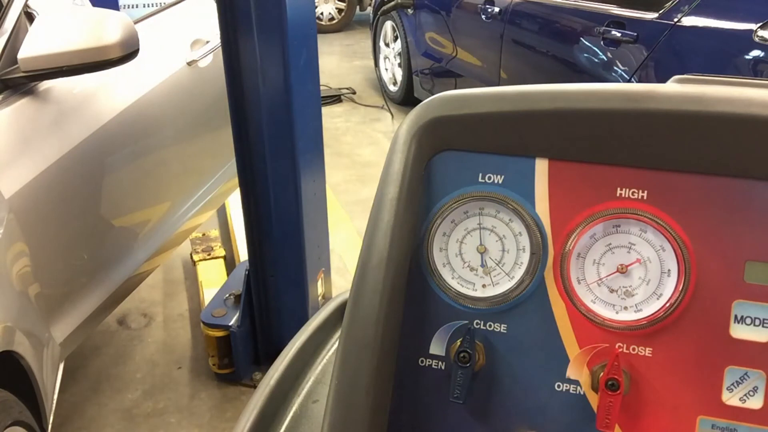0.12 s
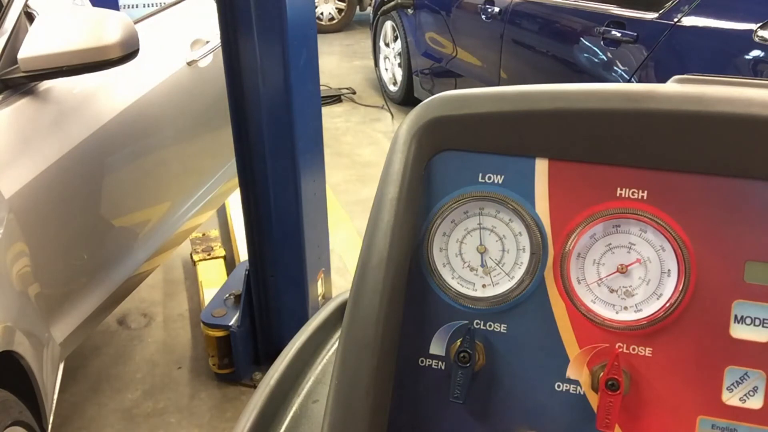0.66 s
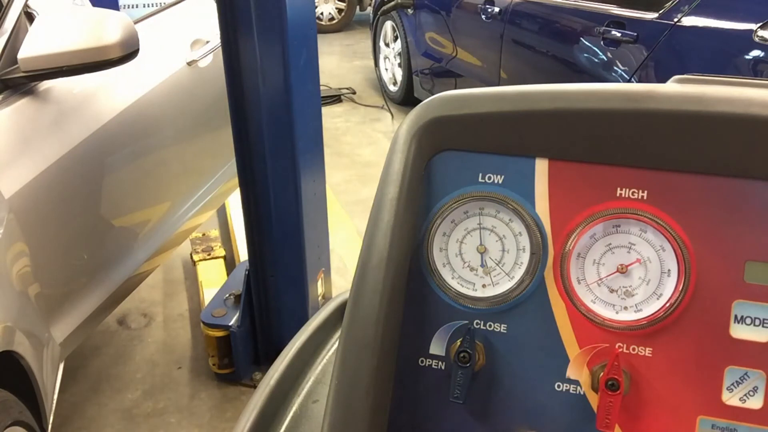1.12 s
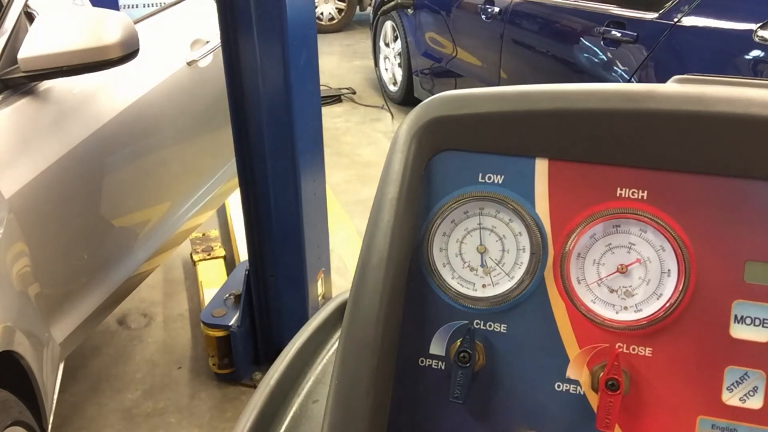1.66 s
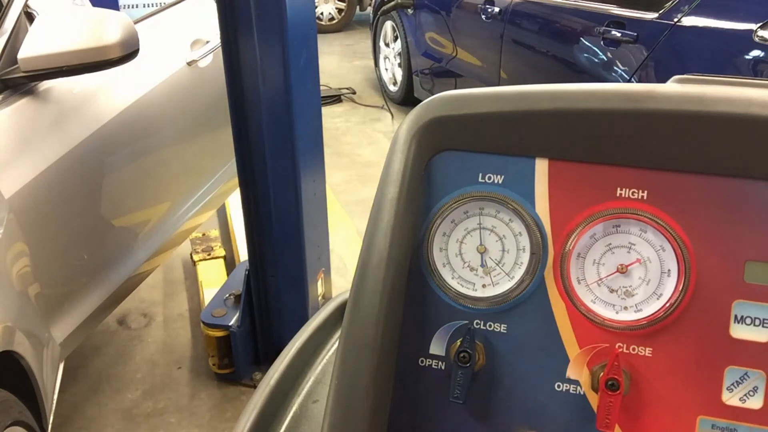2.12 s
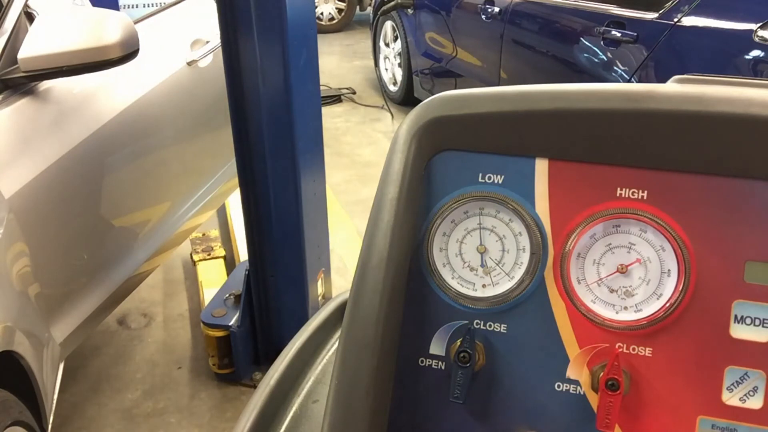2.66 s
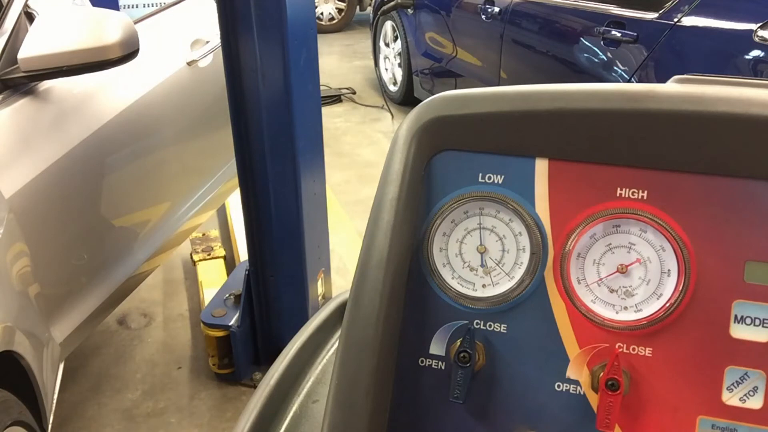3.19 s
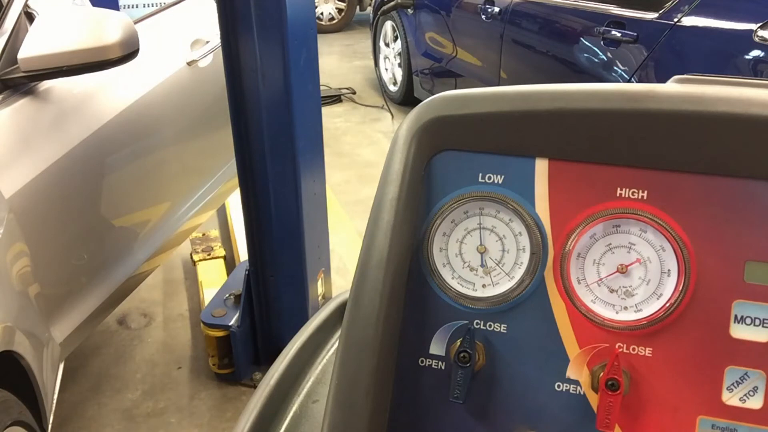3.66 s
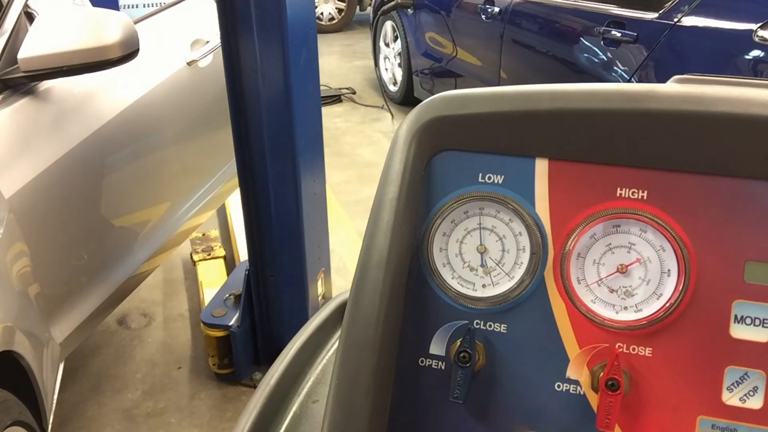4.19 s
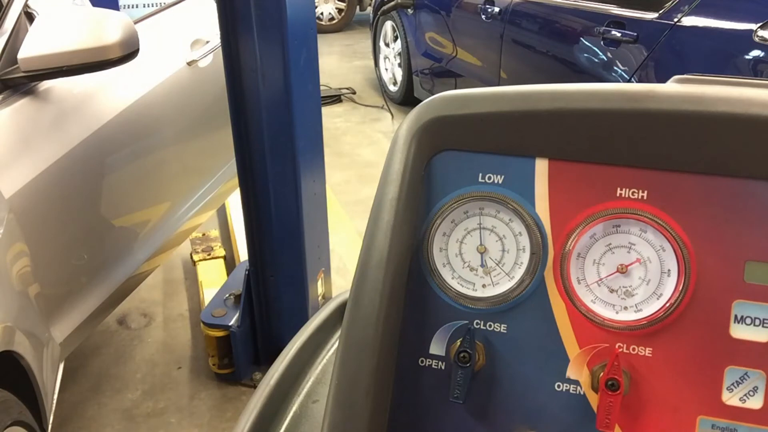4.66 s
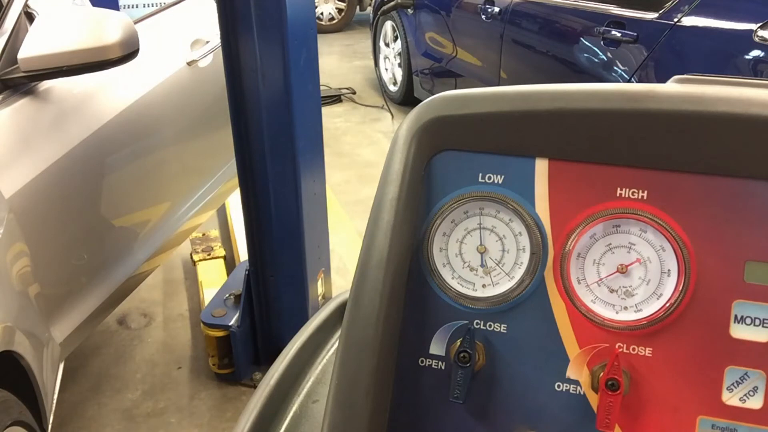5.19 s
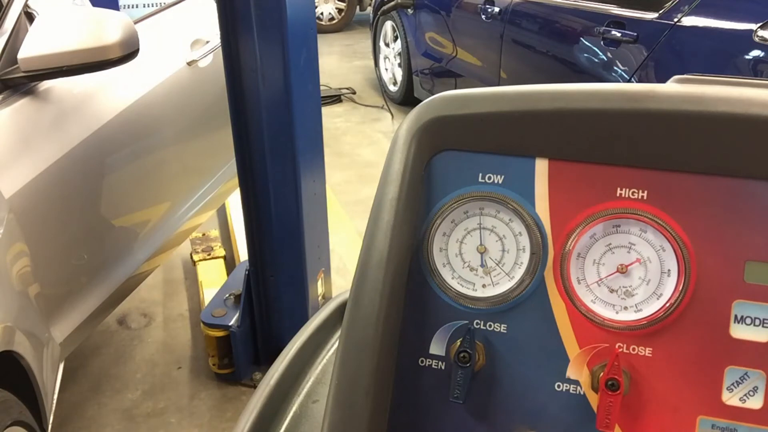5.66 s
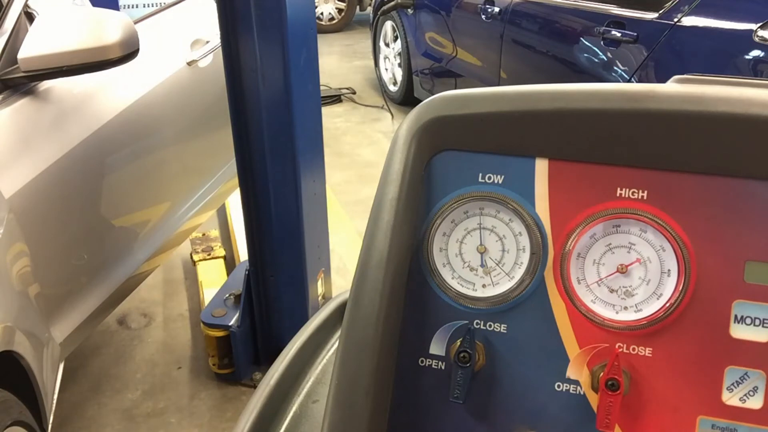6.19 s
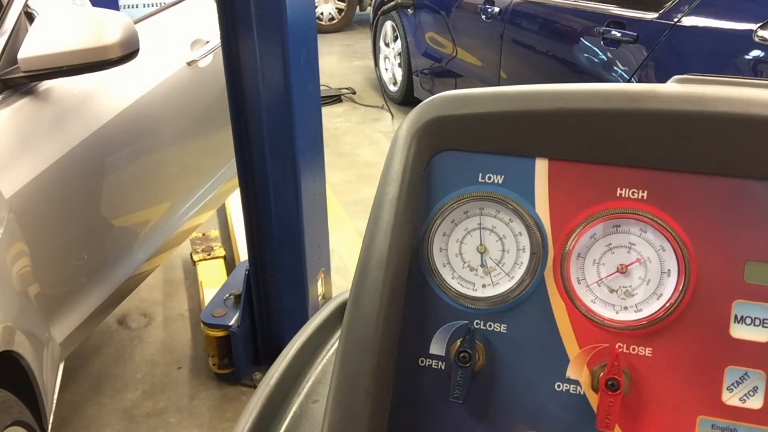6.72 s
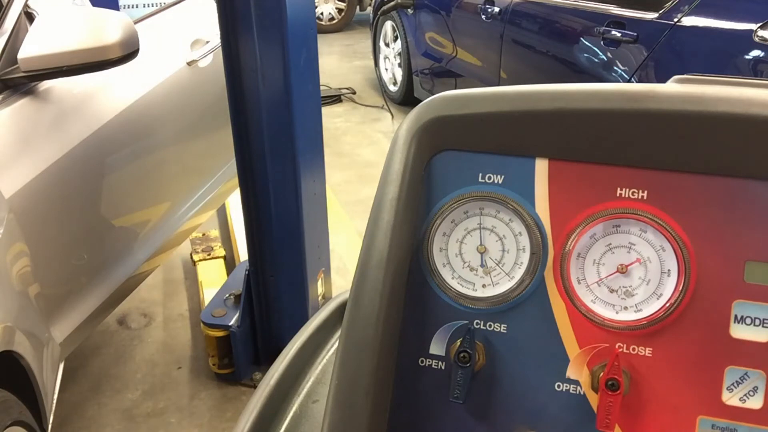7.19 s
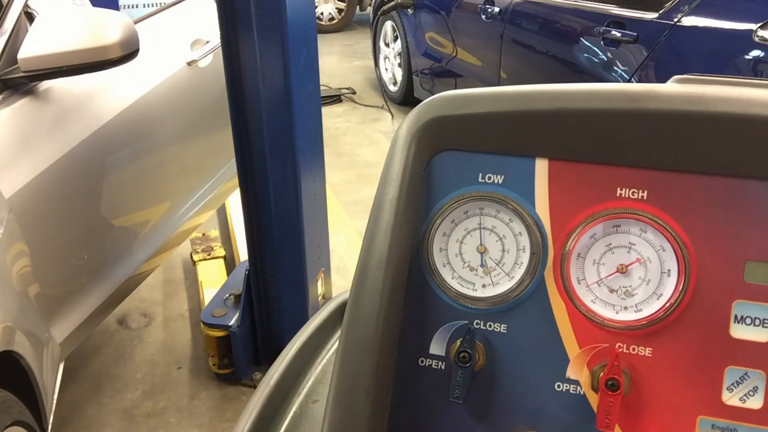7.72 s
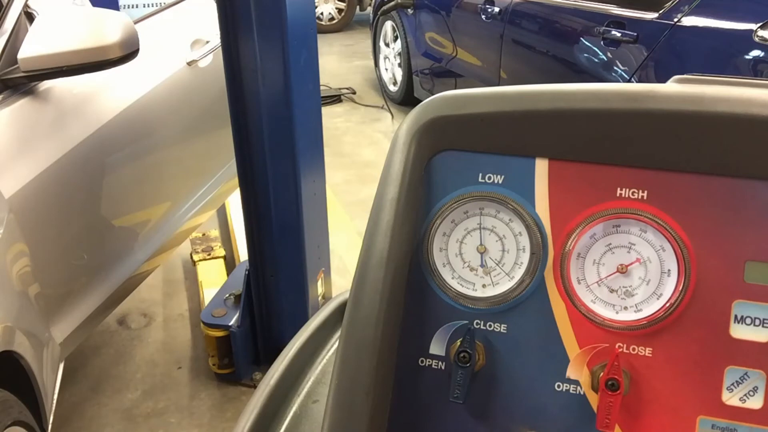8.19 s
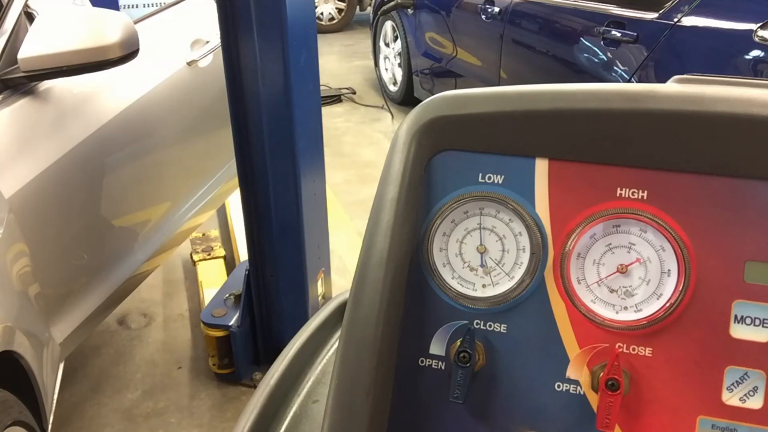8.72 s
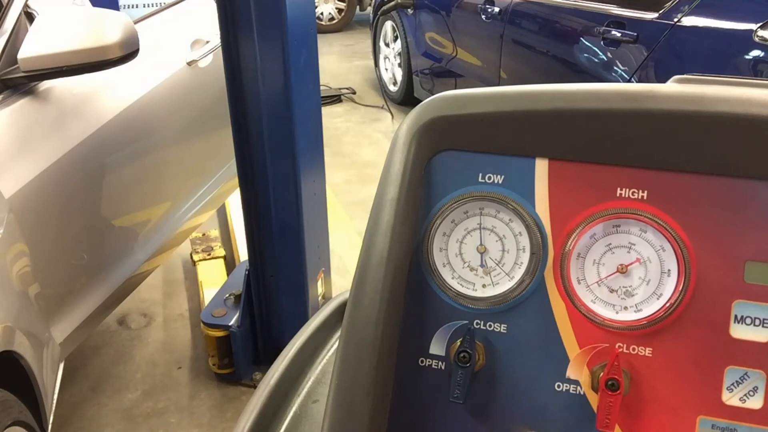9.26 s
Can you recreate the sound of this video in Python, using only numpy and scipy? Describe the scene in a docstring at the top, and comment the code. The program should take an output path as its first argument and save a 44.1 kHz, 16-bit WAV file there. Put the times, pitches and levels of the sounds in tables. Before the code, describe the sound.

A large, reverberant workshop with machinery running steadily from start to finish, heard from one fixed position. A broad deep rumble dominates, mostly bass, with booming room resonances and wavering motor and mains hums that swell irregularly, notably around 2.5, 4, 5.8 and 7.7 seconds. Soft fan hiss lies above, with faint airy swishes, thin mid-range motor strands and, from about 3.4 seconds, a barely audible high whine. A faint ring surfaces near 4.1 and 7.6. Close by, small metal parts tick: weak ones at 0.1 and 0.6, a crisp little rattle at 1.25, the sharpest dry click at 3.23 with light followers, one at 3.8, and faint ticks from 6.6 to 6.8. A loose jingle runs 7.7-7.85, then clicks at 8.2, 8.35 and 8.7, alongside faint, dull distant knocks at 8.2 and 8.6. The rumble continues unchanged to the end at about 9.3.

```python
"""Large workshop, machinery running steadily: broad rumble swells in the low resonances of the hall.
Mains and motor hums waver in pitch and level; motor strands and a thin whine are drifting noise bands.
Fans hiss faintly as shaped noise, an airy swish and a faint ring come and go.
Near by, small metal parts tick and jingle: noisy contacts drive decaying modes. Dull knocks are far off."""
import sys
import numpy as np
from scipy import signal
from scipy.fft import rfft, irfft
from scipy.io import wavfile
from scipy.ndimage import uniform_filter1d

SR = 44100
rng = np.random.default_rng(int(sys.argv[2]) if len(sys.argv) > 2 else 0)


def materialize(psi):
    """Save the field psi as 16-bit PCM at rate SR to the path in sys.argv[1].

    A 1-D psi becomes a single channel; in a 2-D psi each row is a channel.
    """
    bounded = np.clip(np.atleast_2d(psi).T, -1, 1)
    quanta = np.round(bounded * 32767).astype(np.int16)
    wavfile.write(sys.argv[1], SR, quanta)


def gain_from_db(level_db):
    """Convert decibel levels to linear amplitude factors (20 dB per decade)."""
    decades = np.asarray(level_db, float) / 20
    return 10 ** decades


N = 412335  # samples


def level(x, db):
    """Scale to an rms level."""
    return x * gain_from_db(db) / np.sqrt(np.mean(x ** 2))


def walk(rate):
    """Random levels held 1 / rate s and slewed twice; spread near 1."""
    hold = int(SR / rate)
    held = np.repeat(rng.standard_normal(N // hold + 1), hold)
    return 1.317 * uniform_filter1d(uniform_filter1d(held, hold), hold)[:N]


def shaped(gain):
    """Noise with the given gain at each frequency of the whole span."""
    f_hz = np.arange(N // 2 + 1) * SR / N + 1e-3
    return irfft(rfft(rng.standard_normal(N)) * gain(f_hz), N)


def rumble():
    """Rumble and fan noise: octave bands flutter alone; the treble, swish included, dips briefly."""
    # noise spectrum, relative: f/Hz, density/dB per Hz
    spectrum = [(15, -40), (25, -15.5), (76, -2.5), (108, -7.5), (206, -12.5), (236, -17), (335, -24.5),
                (476, -36), (714, -40), (1700, -42.5), (2100, -48), (2900, -54), (4370, -57.5), (4870, -60),
                (5280, -61.5), (16000, -65.5)]
    hz, db = np.transpose(spectrum)

    def colour(f):
        return gain_from_db(np.interp(np.log(f), np.log(hz), db))

    def share(f, mid_hz):
        return np.cos(np.pi / 2 * np.clip(np.log2(f / mid_hz), -1, 1))

    dips_db = -20 * np.clip(walk(70) - 1.05, 0, 1)
    out = 0
    for mid_hz in 16 * 2. ** np.arange(11):
        treble_share = np.clip(mid_hz / 4600, 0, 1) ** 1.9
        dip_share = treble_share * np.clip(1.1 + .5 * walk(40), 0, 1.3)
        flutter_db = 1.48 * walk(9) + dips_db * dip_share
        out = out + shaped(lambda f: colour(f) * share(f, mid_hz)) * gain_from_db(flutter_db)
    # the hall's many overlapping echoes leave fine peaks and dips across the spectrum
    ripple_db = .8 * walk(SR / 100)[:N // 2 + 1]  # one value per frequency bin
    out = irfft(rfft(out) * gain_from_db(ripple_db), N)
    return level(out, -32) + swish() * gain_from_db(0.31 * dips_db)


def booms():
    """Low resonances that the rumble excites: narrow noise bands that swell and fade slowly."""
    # resonances: f/Hz, full width at half amplitude/Hz, level/dB rms
    resonances = [(137.56, 9, -46), (154.4, 7, -45.5), (203.7, 14.9, -43), (269, 16, -66.5),
                  (297.3, 9.9, -60), (332, 19.6, -54.5), (363.1, 7.7, -59.5), (385, 17, -59),
                  (606, 144, -65.5), (728, 72, -68), (847, 40, -71.5), (1334, 125, -69), (1870, 37, -76),
                  (2786, 30, -83)]
    out = 0
    for hz, width_hz, db in resonances:
        band = shaped(lambda f: 1 / (1 + (2 * (f - hz) / width_hz) ** 2))
        out = out + level(band, db)
    return out


def waver(s, db, hz, drift_hz, flutter_db, rate):
    """A tone that follows its level curve while its pitch and level wander."""
    phase = 2 * np.pi * np.cumsum(hz + drift_hz * walk(rate)) / SR
    db = np.interp(np.arange(N) / SR, s, db, left=-150) + flutter_db * walk(rate)
    return np.sqrt(2) * gain_from_db(db) * np.sin(phase)


def hums():
    """Deepest boom, mains hum, lower and upper motor hum: wavering tones under slow swells."""
    # one row per hum in that order: f/Hz, pitch wander/Hz, level wander/dB, pace/(1/s)
    tones = [(45.83, 2.504, 2.9, 12), (60.2, 1.49, 3.6, 8), (74.5, 2.997, 3.73, 14), (177.3, 1.488, 3, 12)]
    # slow swell before wander: t/s, deep/dB rms, mains/dB rms, lower/dB rms, upper/dB rms
    swell_curves = [(0.0, -34.5, -40, -38.5, -40.5), (0.6, -38, -43, -41, -40),
                    (1.3, -39.5, -45, -39, -45.5), (1.9, -33, -39, -39, -43), (2.5, -28.5, -38.5, -36, -44),
                    (3.1, -42, -33.5, -30.5, -43), (3.6, -39.5, -38.5, -35.5, -41),
                    (4.0, -30, -39, -37.5, -31.5), (4.45, -31.5, -48, -40.5, -47),
                    (4.9, -39, -40, -34, -46.5), (5.4, -37, -33.5, -42, -43), (5.8, -33.5, -40, -27.5, -42),
                    (6.5, -43, -44, -35, -42.5), (6.95, -34, -36.5, -40.5, -45),
                    (7.4, -40, -46, -36, -41.5), (7.75, -31, -42.5, -30, -43.5),
                    (8.2, -42, -40.5, -48.5, -44.5), (8.8, -45, -39, -40, -45.5),
                    (9.35, -36, -46, -39.5, -43)]
    s, *swells = np.transpose(swell_curves)
    return sum(waver(s, db, *tone) for db, tone in zip(swells, tones))


def ticks():
    """Brief rattles of contacts: a crack of noise, a low knock, metal modes near the brightest pitch."""
    # contacts: t/s, peak of crack and ring/dB, brightest f/Hz, low knock/dB re that peak,
    # ring share/0-1, low modes/dB
    contacts = [(0.1466, -50, 6130, -14, 0.3, -17), (0.6269, -52, 8260, -15, .2, -15),
                (1.0685, -49, 11600, -21, 0.1, -20), (1.074, -51, 12460, -25, .1, -20),
                (1.2447, -37, 11200, -12, 0.25, -20), (1.247, -39, 7250, -9, .5, -22),
                (1.2502, -40, 11600, -6.5, 0.4, -18), (1.2555, -43, 7250, -20, .4, -20),
                (1.268, -53, 11600, -25, 0.8, -18), (1.278, -60, 6830, -25, .8, -25),
                (3.2293, -32.5, 11700, -24, 0.06, -20), (3.234, -38.5, 6870, -7, 0.2, -8),
                (3.2385, -48, 12750, -25, .2, -20), (3.2714, -50, 6380, -18, .1, -15),
                (3.306, -49, 13500, -9, 0.5, -12), (3.311, -50, 13150, -8, 0.44, -11),
                (3.319, -54, 12900, -25, .7, -20), (3.8275, -44.5, 12820, -22, 0.3, -20),
                (6.5818, -51, 8870, -11, 0.33, -15), (6.6959, -48, 10110, -8, 0.3, -15),
                (6.8243, -44.5, 13520, -19, 0.2, -22), (7.679, -52, 9140, -20, .4, -20),
                (7.686, -42, 13150, -12, 0.44, -10), (7.69, -51, 6830, -20, .8, -8),
                (7.694, -45, 10110, -20, 0.5, -14), (7.702, -42, 13060, -10, 0.44, -3),
                (7.711, -44, 12550, -16, 0.4, -10), (7.716, -50, 8700, -18, .7, 0),
                (7.747, -54, 11200, -20, .5, -20), (7.757, -42, 13300, -20, 0.44, -18),
                (7.764, -44, 12700, -20, 0.5, -10), (7.778, -51, 9200, -18, 0.5, -14),
                (7.808, -56, 9140, -20, .6, -20), (7.8247, -47, 9500, -20, 0.2, -25),
                (7.829, -46, 11000, -20, .1, -25), (7.833, -52, 10110, -25, .7, -25),
                (7.834, -50, 13000, -25, .8, -25), (7.8394, -54, 6830, -20, 0.8, -25),
                (7.848, -57, 8560, -25, .8, -9), (8.161, -42, 10500, -9, .05, -14),
                (8.164, -42, 12750, -5, .35, -14), (8.168, -48, 6500, -6, .05, -10),
                (8.339, -42, 13000, -8, 0.1, -14), (8.3437, -40, 11500, -11, 0.1, -20),
                (8.348, -53, 14040, -25, .8, -25), (8.4387, -53, 11200, -20, 0.8, -12),
                (8.442, -56, 8870, -20, .8, -8), (8.667, -42, 8700, -6, 0.35, -20),
                (8.6744, -42, 6900, -5, 0.25, -6), (8.676, -44, 11830, -10, .3, -10),
                (8.679, -48, 8700, -8, 0.44, -2), (8.68, -50, 14500, -25, .2, -20)]
    # metal modes: f/Hz, relative level/dB, free-ring t60/s
    metal_modes = [(2670, -5, .06), (4490, 1.5, 0.43), (4800, 2, 0.12), (6830, -0.5, 0.39), (7250, 6, .12),
                   (8560, 0, 0.38), (8870, -8, 0.4), (9140, -2, 0.38), (10110, -1, 0.34), (11200, 6, 0.11),
                   (11600, 3, 0.25), (11830, 1, .22), (12460, -2, 0.25), (13150, -1, .25), (12750, 0, 0.3),
                   (13500, 2, .3), (14040, -6, .3)]
    # share of the free ring: for a dry tick/1, growth with ring share/1
    ring_length = .1, .4
    out, t = np.zeros(N + SR), np.arange(SR // 4) / SR
    hz, db, t60_s = np.transpose(metal_modes)[:, :, None]

    def band(x, lo_hz, hi_hz):
        return signal.sosfilt(signal.butter(1, [lo_hz, hi_hz], "band", fs=SR, output="sos"), x)

    def steps(rows, hold):
        held = np.repeat(rng.standard_normal((rows, len(t) // hold + 1)), hold, axis=1)
        return uniform_filter1d(held, hold)[:, :len(t)]

    def peak(x):
        return x / np.abs(x).max()

    for s, peak_db, bright_hz, knock_db, ring_share, low_db in contacts:
        ring_share = np.clip(ring_share, 0, 1)
        push = rng.standard_normal(len(t)) * np.exp(-t / 0.0024) * (1 - np.exp(-t / 0.0016))
        # the point of contact favours the modes near one pitch and a scatter of others
        favour_db = np.maximum(-900 * np.log2(hz / bright_hz) ** 2, -20)
        near_db = np.where(hz < 5000, low_db, favour_db) + 2 * rng.standard_normal(hz.shape)
        detune = 1 + 0.0057 * rng.standard_normal(hz.shape)  # touching parts shift the modes a little
        stutter_db = 5.7 * steps(len(hz), 130)  # loose parts keep touching, so each mode stutters
        decay_s = (ring_length[0] + ring_length[1] * ring_share) * t60_s
        fade = np.exp(-np.log(1000) * t / decay_s)
        tones = np.sin(2 * np.pi * hz * detune * t)
        modes = np.sum(gain_from_db(db + near_db + stutter_db) * fade * tones, axis=0)
        rung = signal.fftconvolve(push, modes)[:len(t)]

        uneven_db = 5.7 * steps(1, 150)[0][:len(t) // 2 + 1]  # uneven peaks across the spectrum
        crack = irfft(rfft(push) * gain_from_db(uneven_db), len(t))
        crack = band(crack, 0.57 * bright_hz, min(1.4 * bright_hz, 17000))
        crack = band(crack, 0.45 * bright_hz, 16400)

        tick = peak(ring_share * peak(rung) + (1 - ring_share) * peak(crack))
        low_knock = band(band(push, 2200, 4800), 2200, 4800)
        tick = tick + gain_from_db(knock_db) * peak(low_knock)
        # scattered hall echo
        echo = rng.standard_normal(len(t)) * np.exp(-t / 0.018)
        tick = tick + gain_from_db(-13.5) * peak(signal.fftconvolve(tick, echo)[:len(t)])
        at = int(s * SR)
        out[at:at + len(t)] += tick * gain_from_db(peak_db)
    return out[:N]


def knocks():
    """Far, dull knocks: puffs of noise in a resonance, energy set by level and fading."""
    # puffs: t/s, level at start/dB rms, f/Hz, half width at half amplitude/Hz, fading/s
    puffs = [(8.125, -70, 2700, 120, .03), (8.214, -47, 1250, 350, .005), (8.62, -60, 1250, 120, .03),
             (8.61, -66, 2780, 150, .03), (8.672, -56, 2750, 200, .015)]
    t, out = np.arange(N) / SR, 0
    for s, db, hz, width_hz, fade_s in puffs:
        fade = (t > s) * np.exp(-np.abs(t - s) / fade_s)
        puff = fade * shaped(lambda f: 1 / (1 + ((f - hz) / width_hz) ** 2))
        out = out + gain_from_db(db) * puff * np.sqrt(np.sum(fade ** 2) / np.sum(puff ** 2))
    return out


def strand(hz, db, width_hz, flutter_db):
    """A narrow band of noise that drifts in pitch, so that it beads, breaks up and wavers."""
    phase = 2 * np.pi * np.cumsum(hz + .12 * width_hz * walk(8)) / SR
    beads = [level(shaped(lambda f: 1 / (1 + (2 * f / width_hz) ** 2)), 0) for _ in range(2)]
    carried = beads[0] * np.sin(phase) + beads[1] * np.cos(phase)
    return carried * gain_from_db(db + flutter_db * walk(28))


def motor_strands():
    """Wavering motor sound in the middle range: drifting narrow noise bands."""
    # strands: f/Hz, level before flutter/dB rms, width/Hz
    bands = [(1166, -73.5, 35), (1432, -75, 16), (1675, -73.5, 18), (1750, -77, 30), (2348, -82, 40),
             (3285, -85, 30)]
    return sum(strand(*row, flutter_db=3.7) for row in bands)


def whine():
    """Thin whine: a noise strand follows its pitch and level curve in spurts."""
    # curve before drift and flutter: t/s, f/Hz, level/dB rms
    curve = [(3.4, 4710, -82), (4.0, 4700, -79), (4.4, 4740, -83), (4.8, 4830, -76.5), (5.2, 4790, -77.5),
             (5.7, 4860, -75), (6.3, 4820, -77), (6.7, 4850, -78.5), (7.2, 4800, -82), (7.5, 4750, -81),
             (7.9, 4830, -79.5), (8.3, 4800, -80), (8.5, 4730, -78), (8.7, 4830, -77.5), (9.0, 4870, -78.5),
             (9.35, 4850, -81)]
    s, hz, db = np.transpose(curve)
    t = np.arange(N) / SR
    return strand(np.interp(t, s, hz), np.interp(t, s, db, left=-150), width_hz=105, flutter_db=3.4)


def faint_ring():
    """Faint ring that comes and goes: one tone of fast wandering pitch and level."""
    # curve before wander: t/s, level/dB rms
    curve = [(0, -76), (3.95, -78), (4.1, -66), (4.25, -77), (7.45, -76), (7.56, -63.5), (7.8, -63.5),
             (7.88, -77), (9.35, -76)]
    s, db = np.transpose(curve)
    return waver(s, db, hz=1507, drift_hz=8.01, flutter_db=4.0, rate=35)


def swish():
    """Airy swish high up: a soft band of noise under a fluttering level curve."""
    # curve before flutter: t/s, level/dB rms
    curve = [(0, -83), (1.6, -83), (2.15, -80), (2.5, -84), (3.8, -83), (3.95, -80), (4.1, -84), (4.5, -83),
             (4.65, -79), (4.8, -85), (6.9, -85), (7.15, -78), (7.35, -82), (8.53, -82), (8.6, -75),
             (8.66, -81), (9.05, -84), (9.18, -80), (9.35, -84)]
    s, db = np.transpose(curve)
    band = shaped(lambda f: 1 / (1 + ((f - 8900) / 500) ** 4))
    return level(band, 0) * gain_from_db(np.interp(np.arange(N) / SR, s, db) + 4.3 * walk(25))


def scene():
    """All sources at one microphone."""
    machines = rumble() + booms() + hums() + motor_strands() + whine() + faint_ring()
    return (machines + ticks() + knocks())[None]


def band_limit(x):
    """A steep low-pass at the top of the band."""
    return signal.sosfilt(signal.butter(12, 16590, fs=SR, output="sos"), x)


def record(dry):
    """The microphone loses the deepest bass and the top is cut."""
    cut = signal.sosfilt(signal.butter(4, 34, "high", fs=SR, output="sos"), dry)
    cut = signal.sosfilt(signal.butter(4, 15200, fs=SR, output="sos"), cut)
    cut = signal.sosfilt(signal.ellip(10, .5, 60, 15750, fs=SR, output="sos"), cut)
    return band_limit(cut)


dry = scene()
out = record(dry)
materialize(out)
```